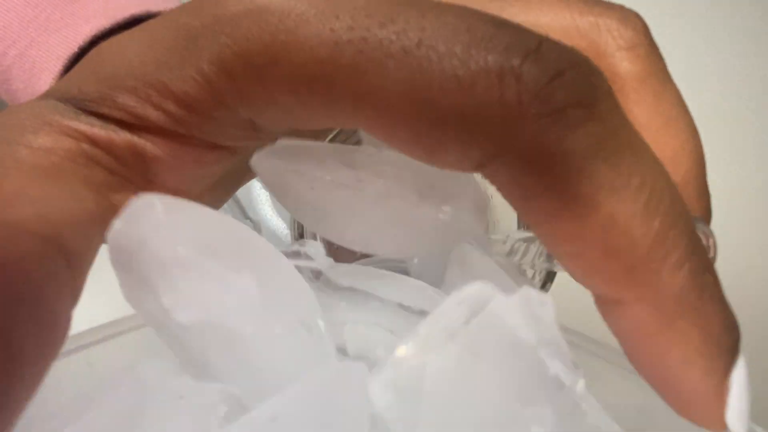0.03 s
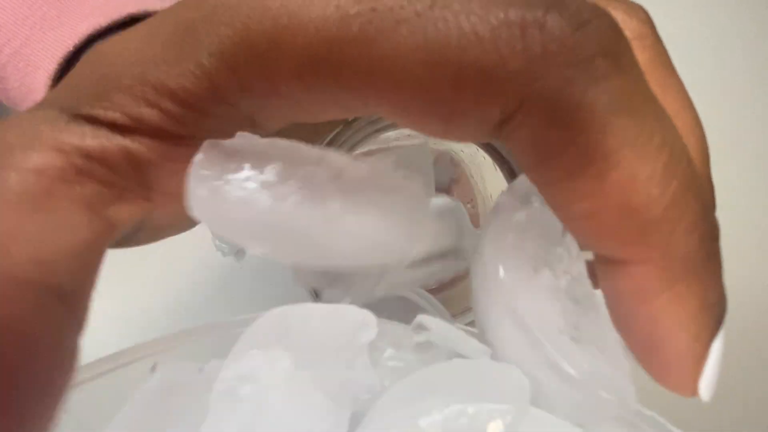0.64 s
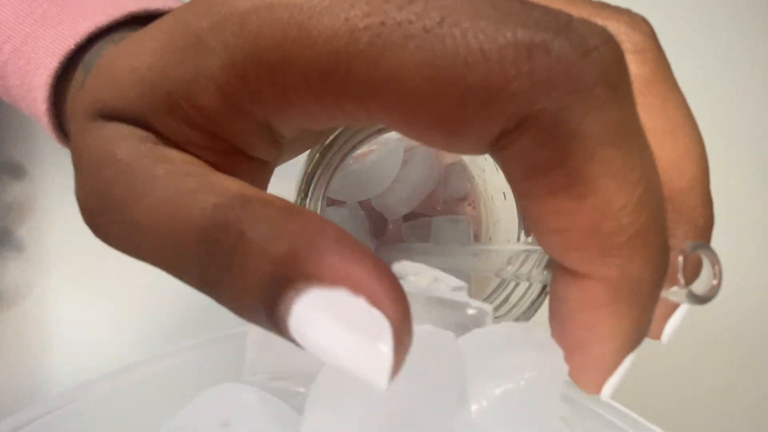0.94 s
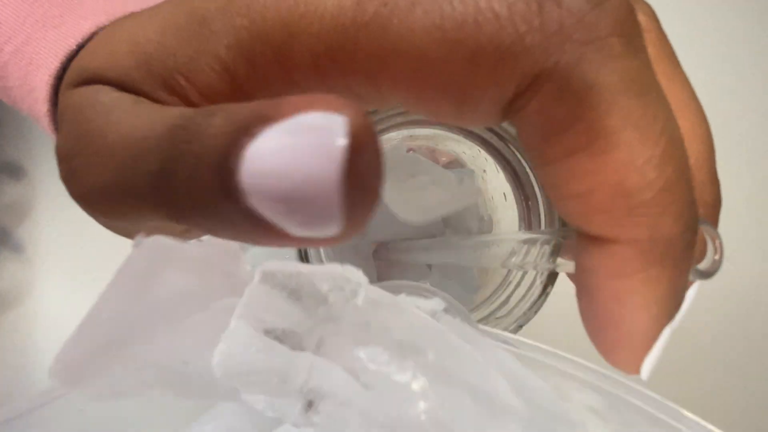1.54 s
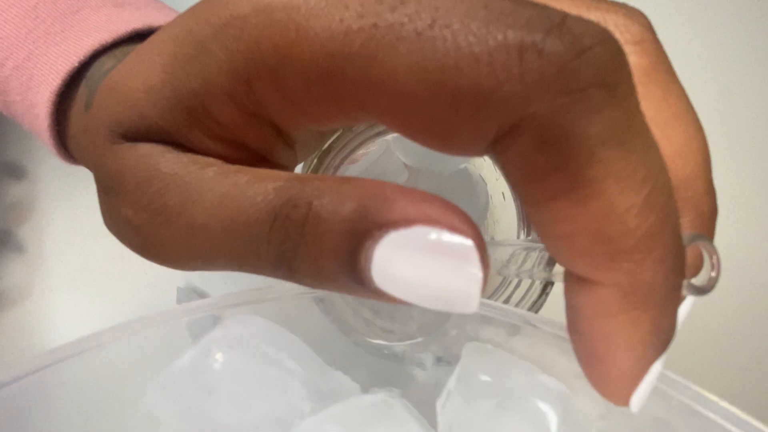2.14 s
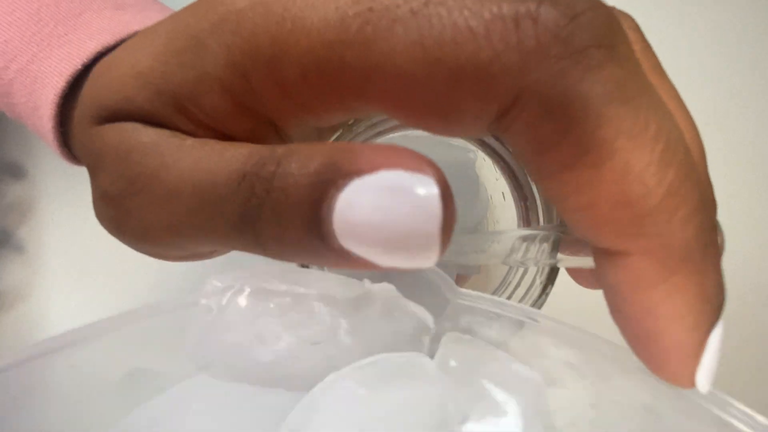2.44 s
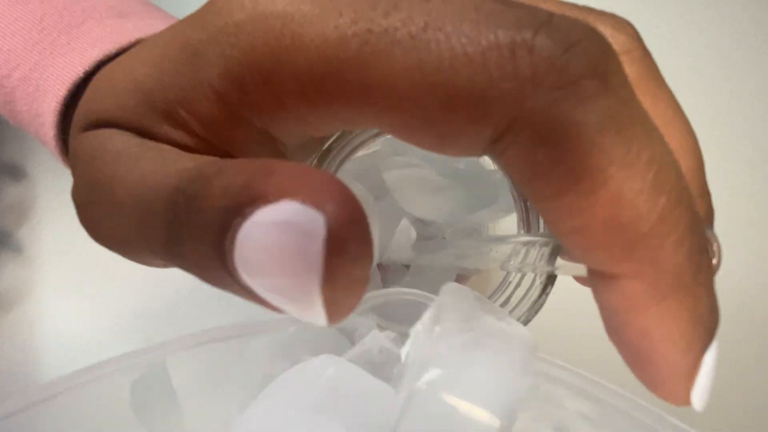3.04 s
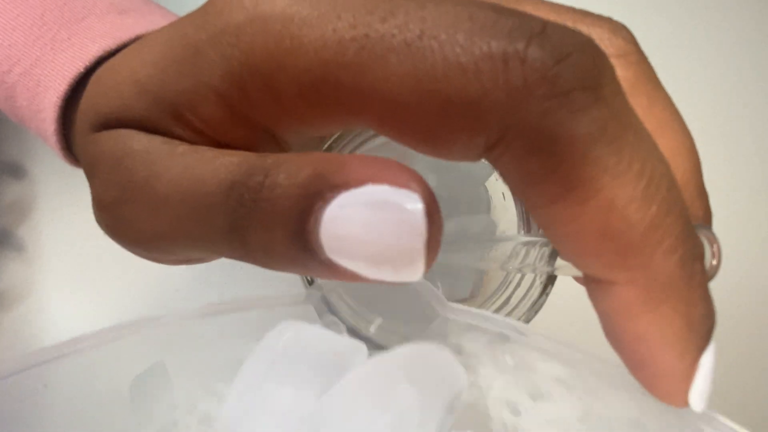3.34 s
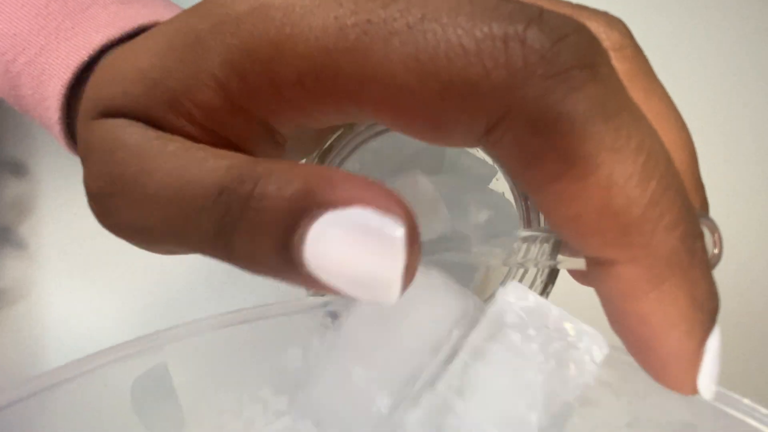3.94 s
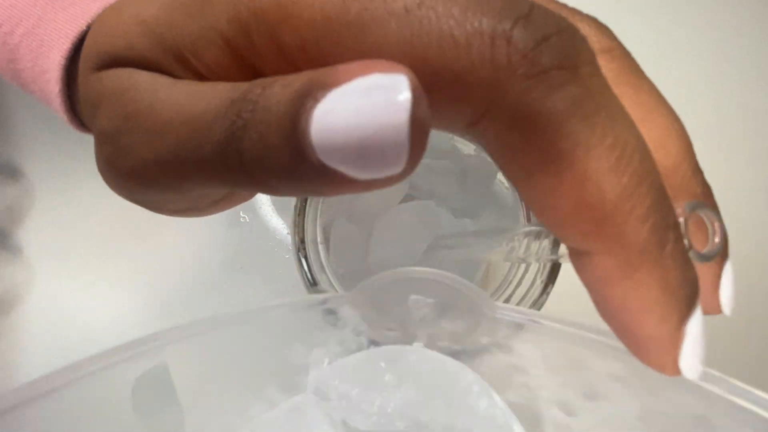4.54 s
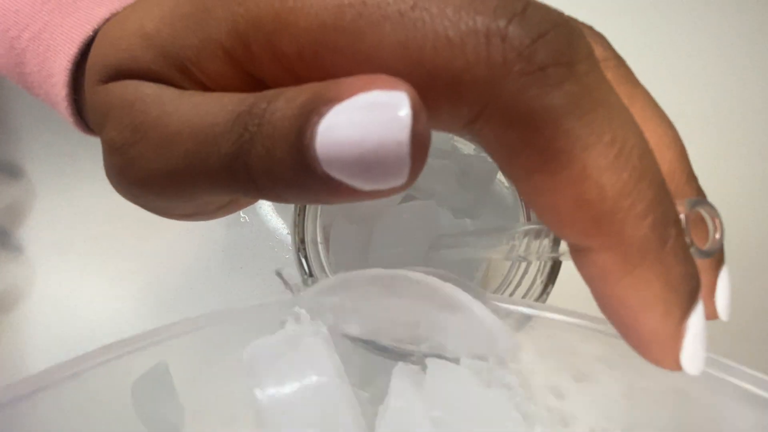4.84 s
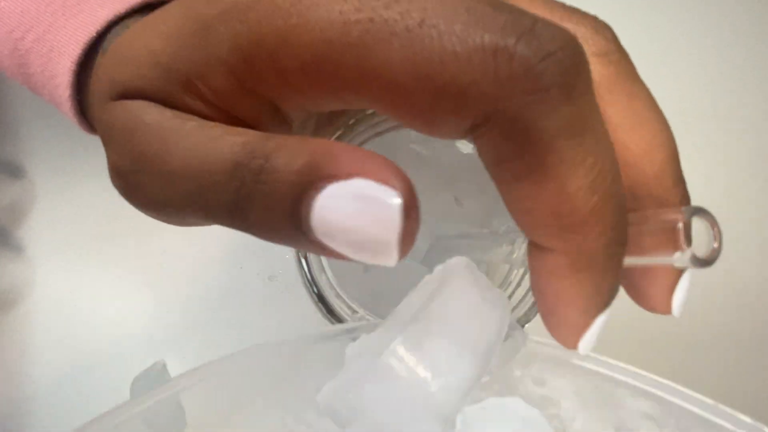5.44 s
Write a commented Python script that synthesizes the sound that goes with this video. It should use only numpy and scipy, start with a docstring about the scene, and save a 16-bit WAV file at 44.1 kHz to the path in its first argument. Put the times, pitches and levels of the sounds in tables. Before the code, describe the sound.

Close ice clatters and slides over hollow plastic as it is shaken into a glass jar, with dull thuds and brief creaks.

```python
"""Ice shaken into a glass jar

Ice cubes are shaken out of a plastic tub into a jar on the counter, close by. They clink on each
other, knock the hollow tub, thud into the jar and ping on its glass. Between the blows the heap
slides and rattles over the plastic, and wedged cubes slip with a short creak."""
import sys
import numpy as np
from scipy import signal
from scipy.fft import rfft, irfft
from scipy.io import wavfile
from scipy.ndimage import uniform_filter1d

SR = 44100
rng = np.random.default_rng(int(sys.argv[2]) if len(sys.argv) > 2 else 0)


def bounce(signal):
    """Save signal as a 16-bit WAV file at the path given by the first command-line argument."""
    frames = np.transpose(np.atleast_2d(signal))
    limited = np.clip(frames, -1, 1)
    pcm = np.round(limited * 32767).astype(np.int16)
    wavfile.write(sys.argv[1], SR, pcm)


N = 250532
AGE_S = np.arange(5000) / SR
BIN_HZ = np.fft.rfftfreq(N, 1 / SR)


def amp(db):
    """Decibels to amplitude."""
    return 10 ** (np.asarray(db) / 20)


def unit(x):
    """Scale to unit power."""
    return x / np.sqrt(np.mean(x ** 2) + 1e-20)


def blow(x):
    """Scale a strike to unit power over its first 10 ms."""
    return x / np.sqrt(np.mean(x[:, :SR // 100] ** 2) + 1e-20)


def smooth(x, width_s):
    """Two passes of a moving average."""
    width = int(width_s * SR)
    return uniform_filter1d(uniform_filter1d(x, width), width)


def curve(points, hz):
    """Interpolate on a log-frequency axis."""
    point_hz, value = np.transpose(points)
    return np.interp(np.log(hz + 1), np.log(point_hz + 1), value)


def add(mix, start_s, sound):
    """Mix in a stereo sound."""
    part = mix[:, max(round(start_s * SR), 0):][:, :sound.shape[1]]
    part += sound[:, :part.shape[1]]


def colour(x, points):
    """Minimum-phase filter: nothing sounds ahead of a click."""
    log_gain = np.log(amp(curve(points, abs(np.fft.fftfreq(N, 1 / SR)))))
    response = np.exp(np.conj(signal.hilbert(log_gain)))[:len(BIN_HZ)]
    return irfft(rfft(x) * response, N)


def ring(modes):
    """Decaying modes, weighted by the spot struck; left and right differ more on higher modes."""
    hz, db, t60_s = np.transpose(modes)[:, :, None]
    spread = np.minimum(hz.T / 6800, 0.18)
    sides = rng.standard_normal((2, len(modes))) + 1j * rng.standard_normal((2, len(modes)))
    spot = rng.uniform(0.45, 1, len(modes)) * rng.choice([-1, 1], len(modes))
    partials = amp(db) * np.exp((2j * np.pi * hz - np.log(1000) / t60_s) * AGE_S)
    return ((spot * (1 + spread * sides)) @ partials).imag


def grit(span_s, low_hz, high_hz, spread):
    """Rough faces crush together: tiny slips swell and die within a few spans."""
    spans = AGE_S[:2000] / span_s
    noise = rng.laplace(size=(3, len(spans)))
    burst = (noise[0] + spread * noise[1:]) * np.sqrt(spans) * np.exp(-spans)
    band = signal.butter(2, [low_hz, min(high_hz, SR / 2 - 1)], "band", fs=SR, output="sos")
    return blow(signal.sosfilt(band, burst))


def cube(treble_db, count=9):
    """One lump of ice: a crunch and short modes. A harder contact is shorter and brighter."""
    softness = amp(-.42 * treble_db)
    contact_s = .0011 * softness
    a, b = rng.random((2, count))
    swell = 1 - np.exp(-AGE_S / contact_s)
    low_ring = ring(np.c_[2600 * 2.25 ** a, -9 * b, softness * (.02 - .011 * b)]) * swell
    high_ring = ring(np.c_[7000 * 2.2 ** b, -6 * a, .013 - .007 * a]) * swell
    out = amp(-1.5) * blow(low_ring) + amp(treble_db - 4) * blow(high_ring)
    add(out, 0, amp(-1) * grit(contact_s, 2480, 6680, spread=0.45))
    add(out, 0, amp(-19.5) * grit(contact_s, 340, 2730, spread=0.78))
    add(out, 0, amp(treble_db - 3.5) * grit(contact_s, 2900, 22200, spread=0.13))
    return out


# tub wall and hollow: pitch_hz, level_db, t60_s
WALL_MODES = [(1428, 5, 0.032), (1270, -5.5, 0.038), (1569, 8.5, 0.022), (1650, 6, 0.031),
              (2284, 4.5, 0.026), (2685, -1, 0.033)]
HOLLOW_MODES = [(618.8, -0.5, 0.055), (678, -4, 0.052)]
def tub(wall_db, hollow_db):
    """A gritty push on the plastic, detuned by the shifting load of ice."""
    load = rng.standard_normal(2)
    wall = ring(np.array(WALL_MODES) * [1 + 0.033 * load[0], 1, 1])
    hollow = ring(np.array(HOLLOW_MODES) * [1 + .018 * load[1], 1, 1])
    attack = 1 - np.exp(-AGE_S / 0.00029)
    out = amp(hollow_db) * blow(hollow) + amp(wall_db - 1) * blow(wall * attack)
    add(out, 0, amp(wall_db - 8) * grit(0.0017, 710, 3440, spread=0.93))
    return out


def stirred(blows, share_db, settle_s):
    """Power of the cubes stirred up by blows: jumps at each, then decays."""
    kicks = np.zeros(N)
    for start_s, db, *_ in blows:
        kicks[round(start_s * SR)] += amp(db + share_db) ** 2
    return signal.lfilter([1], [1, -np.exp(-1 / (settle_s * SR))], kicks)


def jolts(depth_db, width_s):
    """The heap sticks and slips: brief swells in dB at unit mean power."""
    db = depth_db * np.tanh(unit(smooth(rng.standard_normal(N), width_s)))
    return db - 10 * np.log10(np.mean(amp(db) ** 2))


# shakes of the tub: start_s, length_s, ice_db, plastic_db
SHAKES = [(0, 0.013, -22.5, -20.5), (0.134, 0.19, -32, -31), (0.53, 0.19, -43, -30.5),
          (0.677, 0.025, -23, -28.5), (1.03, 0.72, -33, -35), (2.088, 0.37, -31.5, -37.5),
          (2.358, 0.45, -30.5, -31.5), (2.87, 0.45, -29, -36), (3.397, 0.25, -26.5, -28.5),
          (3.739, 0.3, -26, -33.5), (4.082, 0.223, -36.5, -44), (4.404, 0.27, -35, -36),
          (4.827, 0.36, -29, -32), (5.235, 0.25, -31, -39.5)]
def heap_motion(rise_s=0.049, settle_s=0.056, rest_ice_db=-47, rest_plastic_db=-46):
    """Shakes and blows move the heap: levels in dB of ice on ice and ice on plastic."""
    ice = amp(rest_ice_db) ** 2 + stirred(CLINKS, share_db=-18, settle_s=.027)
    ice += stirred(THUDS, share_db=-16, settle_s=.012)
    plastic = amp(rest_plastic_db) ** 2 + stirred(KNOCKS, share_db=-14, settle_s=.028)
    for start_s, length_s, ice_db, plastic_db in SHAKES:
        age_s = np.arange(N) / SR - start_s
        rise = np.clip(1 + age_s / rise_s, 0, 1)
        speed = rise * np.exp(-np.maximum(age_s - length_s, 0) / settle_s)
        ice += (amp(ice_db) * speed) ** 2
        plastic += (amp(plastic_db) * speed) ** 2
    return 10 * np.log10([ice, plastic]) + jolts(depth_db=3.6, width_s=0.018)


def rattle(grains, level_db, per_s, size_db, average_s):
    """Many small random contacts whose average power follows level_db."""
    contact = rng.random(N) < per_s / SR
    size = np.minimum(rng.exponential(1, N), 3.5)
    kind = rng.integers(0, len(grains), N)
    hits = contact * amp(size_db * size)
    power = smooth(hits ** 2, average_s)
    hits = hits / np.sqrt(abs(power) + 1e-4) * amp(level_db)
    grains = [grain / np.sqrt(np.sum(grain ** 2) / 2) for grain in grains]
    out = np.zeros((2, N))
    for at in np.flatnonzero(hits):
        add(out, at / SR, hits[at] * grains[kind[at]])
    return out


def heap(ice_db, plastic_db, count=40):
    """Cubes tumble over each other and slide over the plastic."""
    small_cubes = [cube(db) for db in rng.normal(-6, 5.5, count)]
    small_knocks = [tub(0, db) for db in rng.normal(-4.5, 3.5, count)]
    tumbling = rattle(small_cubes, ice_db, per_s=380, size_db=3.8, average_s=.04)
    sliding = rattle(small_knocks, plastic_db, per_s=600, size_db=2.8, average_s=.035)
    return tumbling, sliding


# rumble spectrum: freq_hz, density_db
RUMBLE_SPECTRUM = [(35, -35), (52, -1), (80, -9), (250, -10), (450, -3), (2000, -23)]
def rumble(plastic_db, room_db=-50):
    """Low noise of the handled tub over the steady room."""
    spectrum = rfft(rng.standard_normal(N)) * amp(curve(RUMBLE_SPECTRUM, BIN_HZ))
    return np.hypot(amp(plastic_db - 11.5), amp(room_db)) * unit(irfft(spectrum, N))


# cube on cube: start_s, level_db, treble_db
CLINKS = [(.041, -22.5, -0.5), (.088, -42.5, 20), (0.207, -23, -4), (.295, -20.5, 0), (0.313, -21.5, 4),
          (.424, -45, -6), (.467, -36.5, -7), (0.554, -21, -8), (.572, -31.5, -5), (.602, -22, -5),
          (.661, -23, 3), (.675, -20.5, -6), (0.714, -18.5, 1), (.720, -22, 6), (.736, -24, 0),
          (0.751, -22.5, 1), (0.7872, -19.5, -1), (0.798, -19, 0), (.820, -16, -4.5), (.829, -17, -1),
          (.891, -17, 0), (1.1, -17, -3), (1.112, -31, 11.5), (1.167, -24, 8), (1.185, -16.5, 0),
          (1.199, -16.5, 5), (1.275, -16.5, -1.5), (1.282, -34, 7), (1.296, -15.5, -8), (1.308, -18, -11),
          (1.345, -19, -5.5), (1.399, -20.5, -6), (1.419, -22, -10), (1.529, -22, -4), (1.550, -18.5, -9),
          (1.626, -18.5, 1), (1.759, -24, -6), (1.772, -19.5, 2), (1.787, -22, -1), (1.855, -14.5, -1.5),
          (1.883, -23, -4), (1.905, -23, -1), (1.951, -22, -2), (1.971, -27, 5), (1.989, -28, 9),
          (2.037, -27, -0.5), (2.075, -22, -1), (2.087, -18, -19), (2.142, -32, 4), (2.355, -25, -7),
          (2.473, -28, 5), (2.538, -23.5, -3.5), (2.627, -21.5, 1), (2.646, -17.5, 0), (2.872, -18.5, -0.5),
          (2.967, -20, 4), (2.997, -18.5, 0.5), (3.007, -15, -7), (3.034, -21.5, -5), (3.092, -26, 1.5),
          (3.135, -26.5, -1), (3.157, -25, -3), (3.364, -20.5, -12), (3.378, -20, -19), (3.414, -13.5, -4),
          (3.471, -18, 0.5), (3.545, -21.5, -3), (3.602, -19.5, -2.5), (3.747, -23.5, 2), (3.795, -35, 16),
          (3.808, -21, -20), (3.832, -15.5, -4), (3.875, -20, 1), (3.917, -21, -13), (3.930, -24.5, 2),
          (4.010, -14.5, -1), (4.103, -24, -10), (4.143, -24.5, 10.5), (4.202, -30, 10), (4.21, -20, -1),
          (4.322, -29, -1.5), (4.38, -31.5, 6), (4.472, -22.5, 9), (4.885, -28.5, -4), (5.030, -20.5, 3),
          (5.132, -26.5, 5.5), (5.163, -19.5, 3), (5.255, -19, -6), (5.299, -19.5, -5), (5.335, -20.5, 8),
          (5.371, -21.5, -5), (5.394, -21.5, -6), (5.437, -22.5, -10), (5.458, -22, -13), (5.601, -35, 2),
          (5.628, -23.5, 1)]
def clinks():
    """A faint tick comes just ahead, then the cube cracks down and rebounds duller."""
    out = np.zeros((2, N))
    for start_s, db, treble_db in CLINKS:
        rebound = np.interp(db, [-27, -16], [.15, .58])  # share of the power; heavy blows rebound more
        tick_s = start_s - rng.uniform(.001, .007)
        add(out, tick_s, amp(db - 11) * cube(treble_db - 4))
        add(out, start_s, amp(db) * np.sqrt(1 - rebound) * cube(treble_db + .5))
        rebound_s = start_s + rng.uniform(.0014, .0036)
        add(out, rebound_s, amp(db) * np.sqrt(rebound) * cube(treble_db - 2))
    return out


# cube on tub: start_s, wall_db, hollow_db
KNOCKS = [(.047, -25.5, -28), (0.606, -26, -28.5), (1.1001, -14.5, -20.5), (1.28, -19, -22),
          (1.2971, -35, -21.5), (1.7743, -22, -32.5), (2.6287, -28, -19.5), (2.649, -23, -25.5),
          (2.8724, -34, -22.5), (2.9678, -26, -19.5), (3.276, -24.5, -25), (3.4736, -15.5, -29),
          (3.8749, -25.5, -26), (3.9183, -25, -25.5), (4.1034, -27.5, -30.5), (4.919, -26, -26),
          (5.327, -42, -26), (5.472, -36.5, -28)]
def knocks(clink_share_db=-17.5):
    """Cubes hit the tub; clinks pass through the heap and sound its hollow too."""
    out = np.zeros((2, N))
    for start_s, wall_db, hollow_db in KNOCKS:
        add(out, start_s, tub(wall_db, hollow_db))
    for start_s, db, _ in CLINKS:
        add(out, start_s, amp(db + clink_share_db) * blow(ring(HOLLOW_MODES)))
    return out


# jar on the counter: pitch_hz, level_db, t60_s
JAR_MODES = [(194, -0.5, 0.062), (238.3, -0.5, 0.092), (370.6, -1, 0.093)]
# heavy landings: start_s, level_db, pitch_hz
THUDS = [(0.522, -17, 354), (0.689, -10, 388), (0.717, -5.5, 389.6), (0.753, -8, 392), (0.802, -12, 282),
         (0.828, -8, 419), (1.279, -7, 431), (1.287, -15, 190), (1.619, -23.5, 420), (1.857, -19, 447),
         (2.087, -21, 462), (3.135, -22.5, 454), (5.469, -24.5, 323)]
def thuds(t60_s=.07):
    """Landing cubes shake jar and counter; where they land picks the strongest ring."""
    out = np.zeros((2, N))
    attack = 1 - np.exp(-AGE_S / 0.0022)
    for start_s, db, hz in THUDS:
        body = blow(ring(JAR_MODES)) + amp(10) * blow(ring([(hz, 0, t60_s)]))
        add(out, start_s, amp(db - 9) * blow(body) * attack)
    return out


# glass wall: pitch_hz, level_db, t60_s
GLASS_MODES = [(2930, 0, 0.27), (5130, 16, 0.02), (5360, 19, 0.023)]
def chatter(count=12):
    """Landed cubes rattle on in the jar after each thud."""
    level_db = 10 * np.log10(stirred(THUDS, share_db=-21, settle_s=0.047) + 1e-12)
    taps = [ring(GLASS_MODES + JAR_MODES) for _ in range(count)]
    return rattle(taps, level_db, per_s=200, size_db=3, average_s=.04)


# cube on glass: start_s, level_db, pitch_hz
PINGS = [(.736, -24, 5700), (0.859, -23.5, 5380), (0.893, -21, 5380), (0.91, -22.5, 2920),
         (1.53, -17.5, 5260), (1.858, -15, 4330), (1.952, -22, 5250), (2.999, -17, 5660)]
def pings(t60_cycles=68):
    """The glass rings briefly; the spot struck picks the strongest ring."""
    out = np.zeros((2, N))
    attack = 1 - np.exp(-AGE_S / 0.00052)
    for start_s, db, hz in PINGS:
        glass = .5 * blow(ring(GLASS_MODES)) + blow(ring([(hz, 0, t60_cycles / hz)]))
        add(out, start_s, amp(db) * blow(glass * attack))
    return out


# ice creaking on plastic: release_s, level_db, pitch_hz
SLIPS = [(2.511, -26.5, 1300), (2.551, -23, 1380), (2.5655, -24.5, 2120), (3.7165, -27, 1610),
         (4.608, -31.5, 1370), (4.7025, -30.5, 1300), (4.7095, -24.5, 1690), (4.7385, -28.5, 1390),
         (4.9458, -26, 1760), (5.082, -25, 1420), (5.139, -28.5, 1330)]
def slips(scrape_s=.018, band_ratio=1.69):
    """A wedged cube scrapes, then lets go: a friction snap, a clack and the tub's hollow ring."""
    out = np.zeros((2, N))
    for release_s, db, hz in SLIPS:
        band_hz = hz / band_ratio, hz * band_ratio
        add(out, release_s - scrape_s, amp(db - 13.5) * grit(scrape_s, *band_hz, spread=0.095))
        add(out, release_s, amp(db + 1) * grit(0.0012, *band_hz, spread=0.1))
        clack = amp(db - 1) * blow(ring([(hz, 0, .025)]))
        hollow = amp(db - 2.5) * blow(ring(HOLLOW_MODES))
        add(out, release_s, clack + hollow)
    return out


def echoes(x, decay, delay_s, count=700, slot=20):
    """Sparse reflections, different left and right; each band dies at its own rate."""
    taps = np.zeros((2, count * slot))
    arrivals = np.arange(count) * slot + rng.integers(0, slot, (2, count))
    np.put_along_axis(taps, arrivals, rng.choice([-1., 1.], (2, count)), 1)
    hz, age_s, bands = signal.stft(taps, SR, nperseg=128)
    fade = np.exp(-np.log(1000) * age_s / curve(decay, hz)[:, None])
    tail = signal.istft(bands * fade, SR)[1]
    out = np.zeros((2, N))
    add(out, delay_s, signal.fftconvolve(x, tail / np.linalg.norm(tail[0]), axes=1))
    return out


# tone of the ice: freq_hz, gain_db
ICE_COLOUR = [(400, 10), (2000, 1.5), (2800, -4), (3400, -4.5), (5400, -0.5), (7500, -1), (10000, -4.5),
              (15000, -11)]
# kitchen reverberation: freq_hz, t60_s
ROOM_DECAY = [(200, 0.91), (5000, 0.24), (15000, 0.046)]
def scene():
    """Ice, tub and jar, with near reflections from hand and counter and a small kitchen behind."""
    ice_db, plastic_db = heap_motion()
    tumbling, sliding = heap(ice_db, plastic_db)
    low_noise = rumble(plastic_db)
    ice = colour(clinks() + tumbling, ICE_COLOUR)
    clatter = ice + chatter() + pings() + knocks() + slips() + sliding
    near = amp(-14) * echoes(clatter, decay=[(500, 0.11), (10000, 0.097)], delay_s=0.0024)
    jar = thuds()
    far = amp(-20.5) * echoes(clatter + jar, ROOM_DECAY, delay_s=.008)
    return clatter + jar + near + far + low_noise


# overall tone: freq_hz, gain_db
AIR_COLOUR = [(22, -19), (50, -1), (200, 3.5), (1000, 1.5), (1600, 0)]
# phase between the ports: freq_hz, left_lead_rad
PORT_PHASE = [(0, 0), (2150, 0.5), (2500, 1.7), (3700, 0.9), (5250, 1.2), (9910, 5.9), (16500, 13.1)]
# balance between the ports: freq_hz, left_minus_right_db
PORT_BALANCE = [(60, -1), (300, -3), (620, -10), (1000, -2), (1600, 0), (2400, -5), (5000, -3), (7000, -.5)]
def record(dry):
    """Two spaced microphone ports, soft overload and a band limit."""
    phase_rad = np.interp(BIN_HZ, *np.transpose(PORT_PHASE))
    lean = amp(curve(PORT_BALANCE, BIN_HZ) / 2)
    ports = np.array([lean * np.exp(.5j * phase_rad), np.exp(-.5j * phase_rad) / lean])
    ports /= np.sqrt((lean ** 2 + lean ** -2) / 2)
    heard = irfft(rfft(colour(dry, AIR_COLOUR)) * ports, N)
    clipped = heard / (1 + heard ** 4) ** (1 / 4)
    lowpass = signal.firwin(301, cutoff=15850, window=("kaiser", 8), fs=SR)
    return signal.oaconvolve(clipped, lowpass[None], "same")


dry = scene()
out = record(dry)
bounce(out)
```